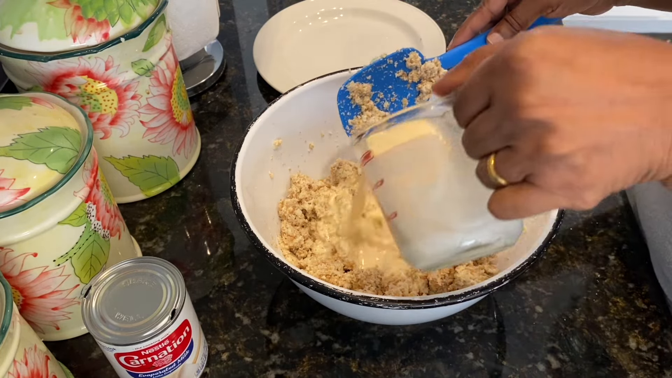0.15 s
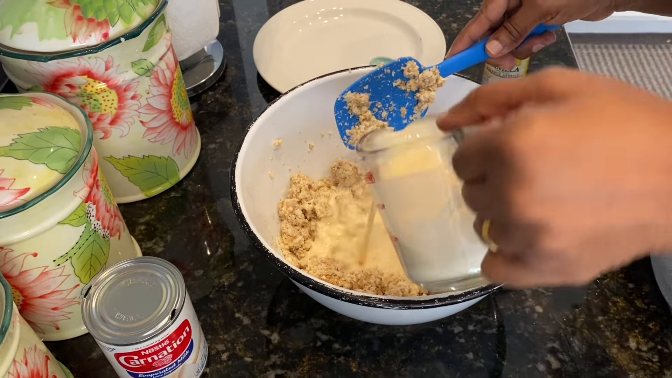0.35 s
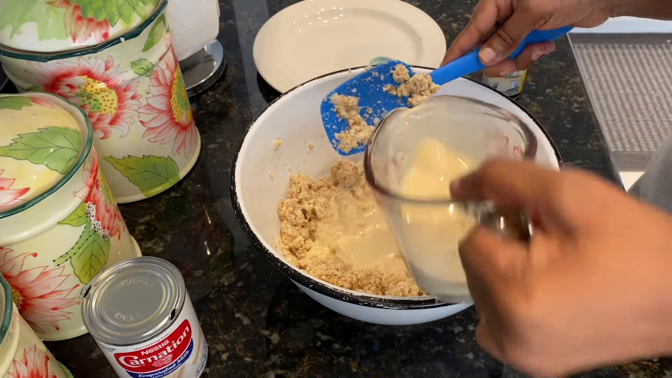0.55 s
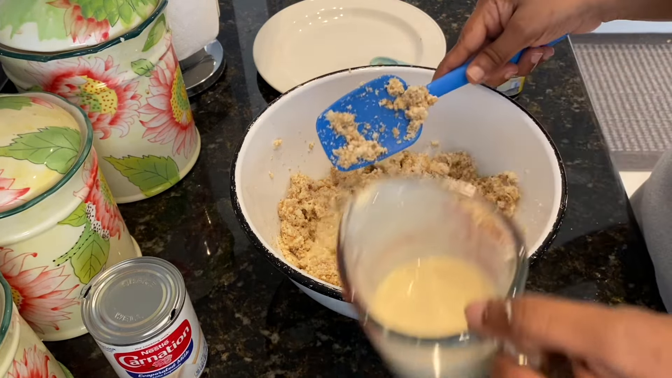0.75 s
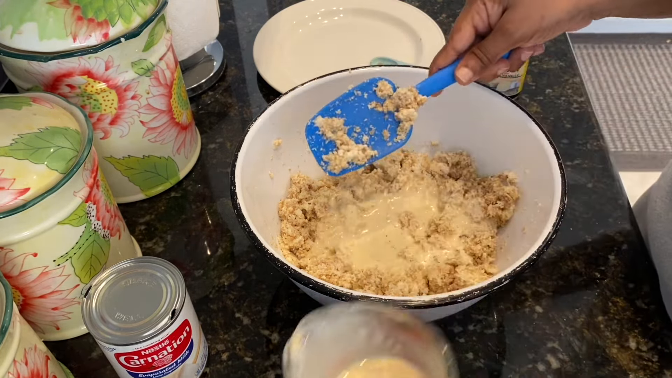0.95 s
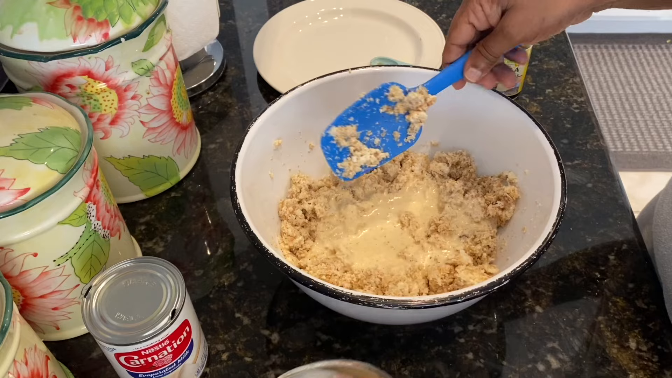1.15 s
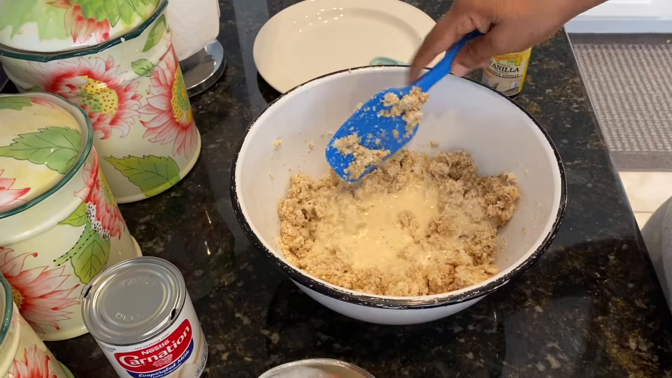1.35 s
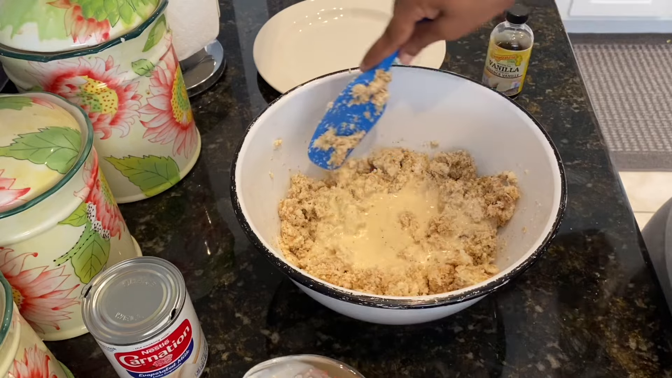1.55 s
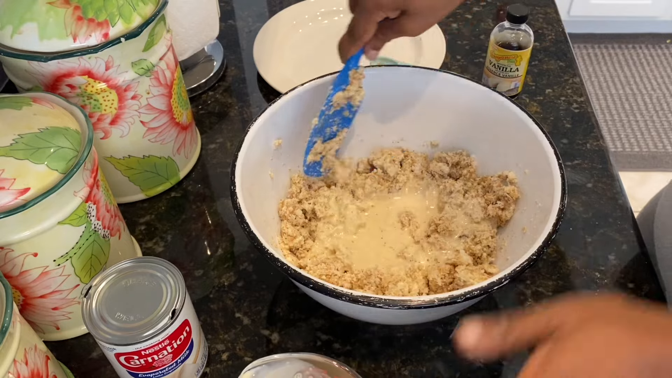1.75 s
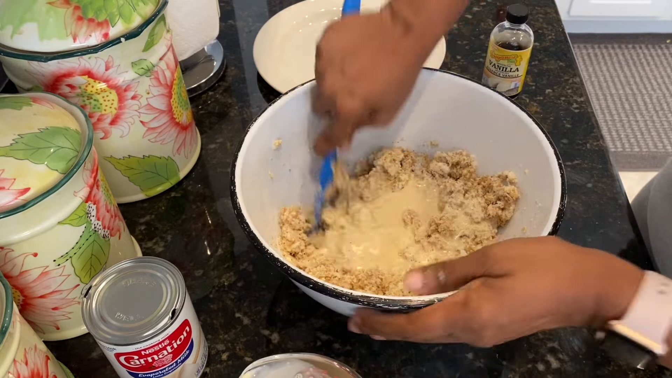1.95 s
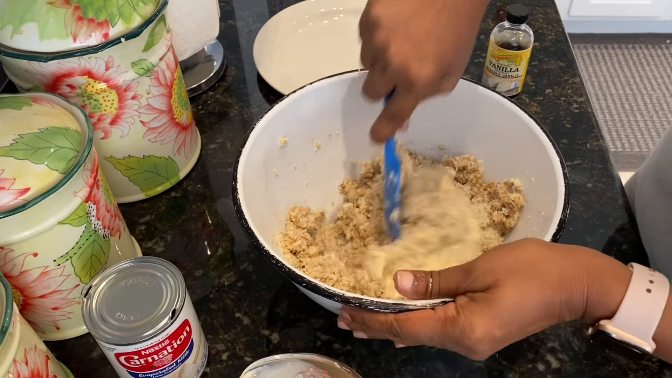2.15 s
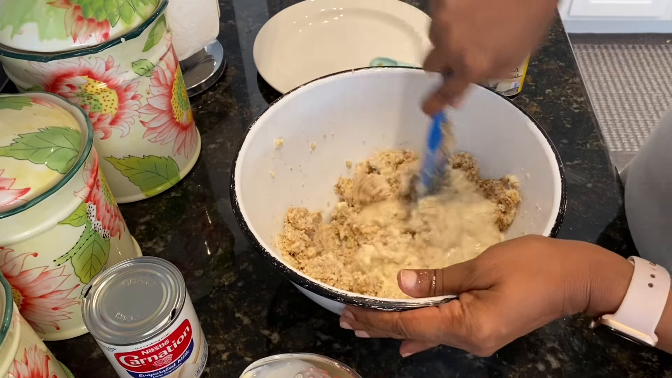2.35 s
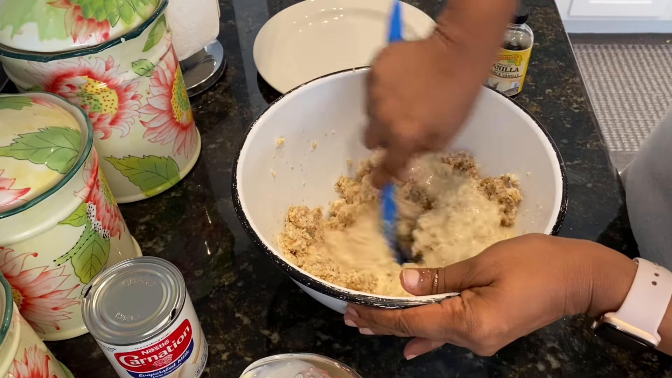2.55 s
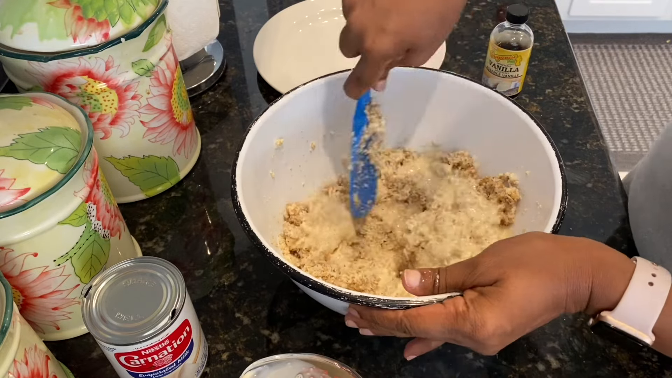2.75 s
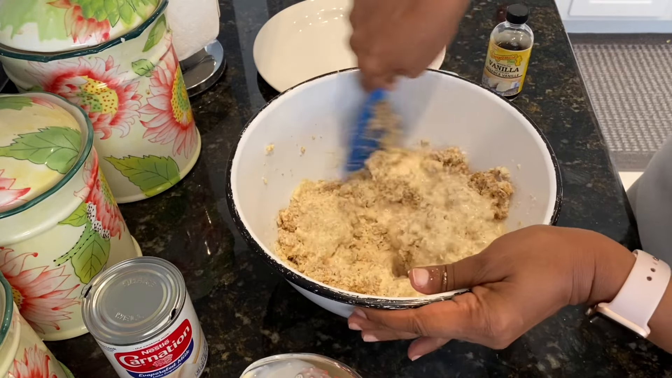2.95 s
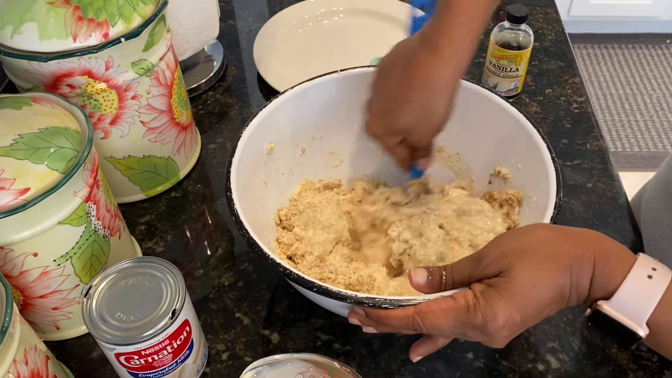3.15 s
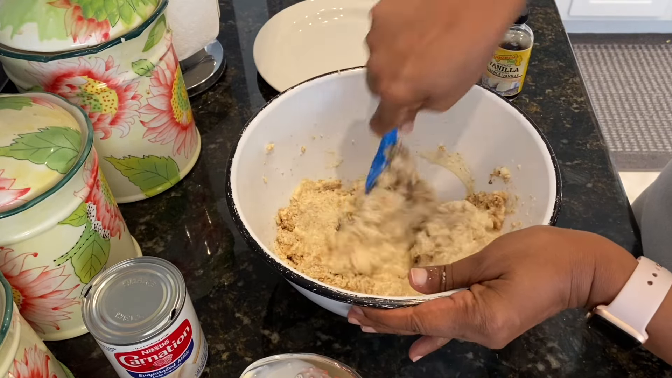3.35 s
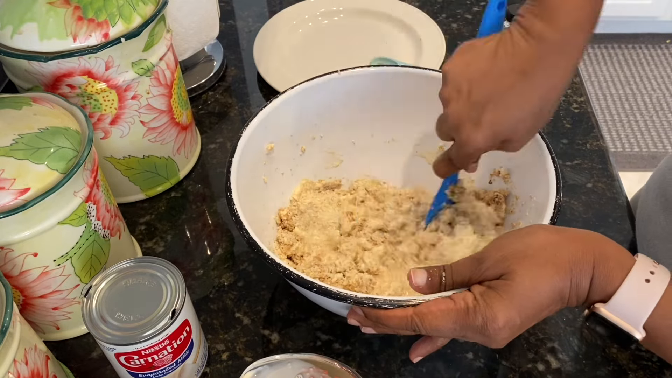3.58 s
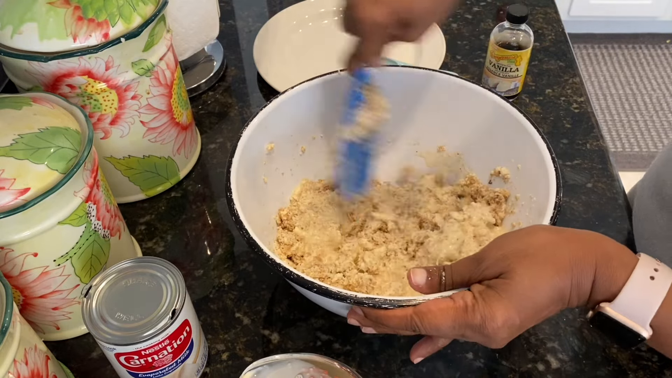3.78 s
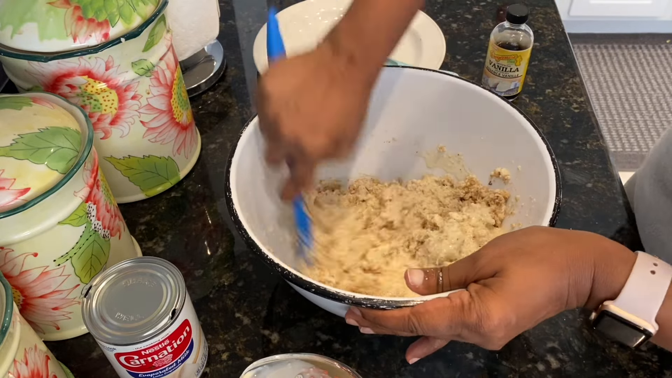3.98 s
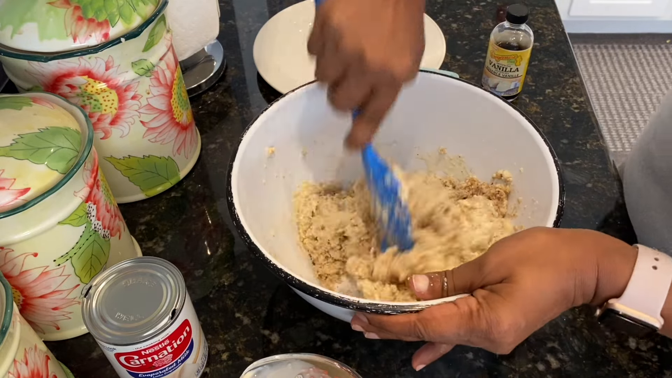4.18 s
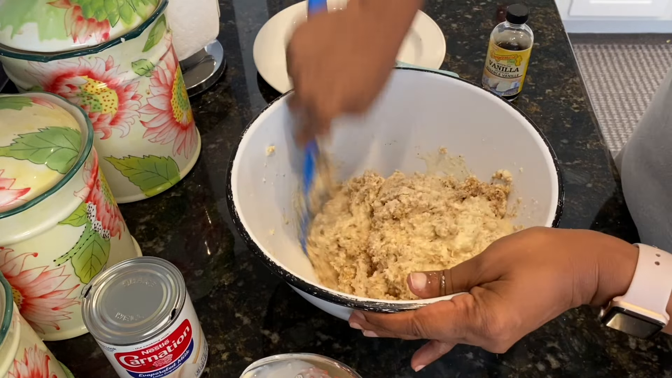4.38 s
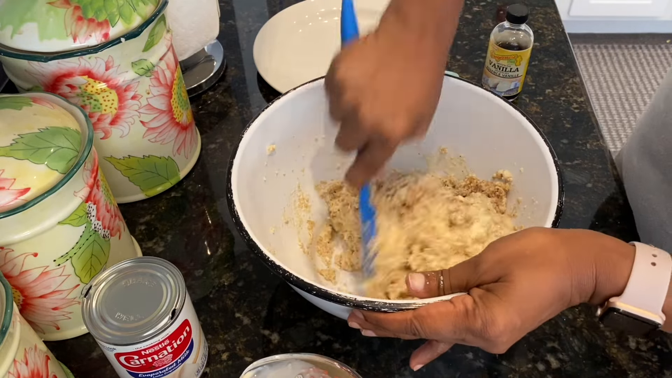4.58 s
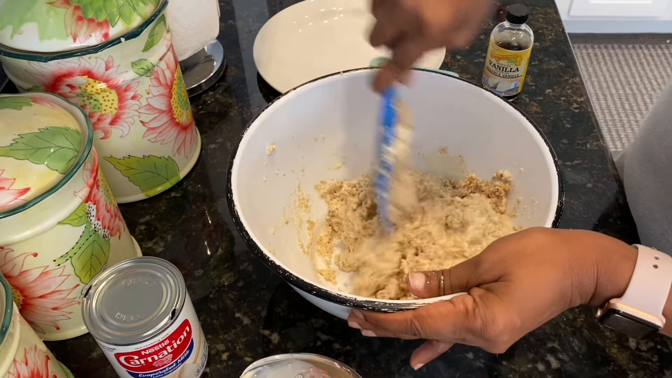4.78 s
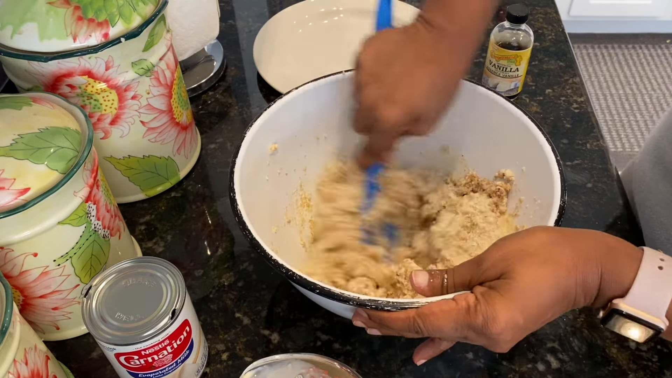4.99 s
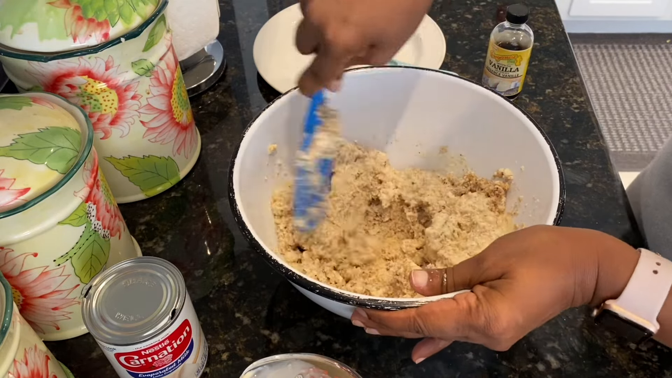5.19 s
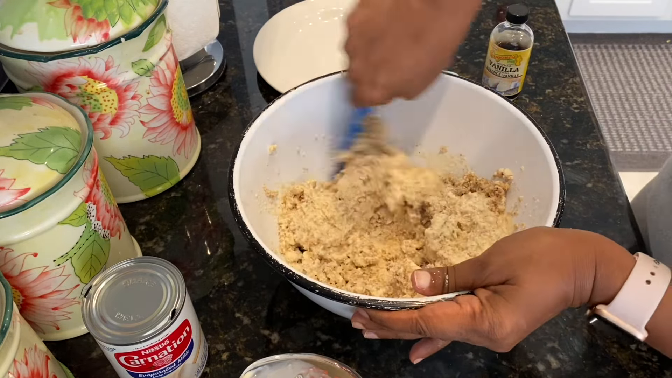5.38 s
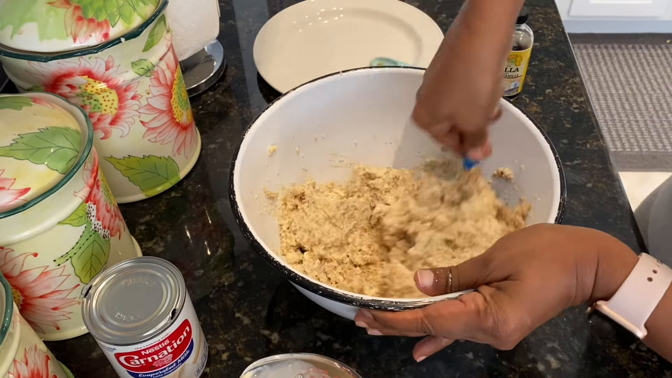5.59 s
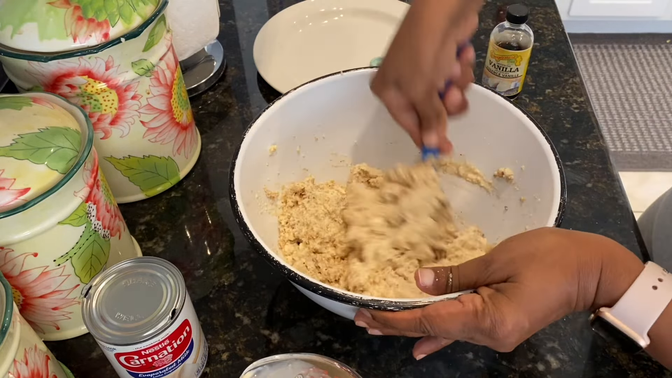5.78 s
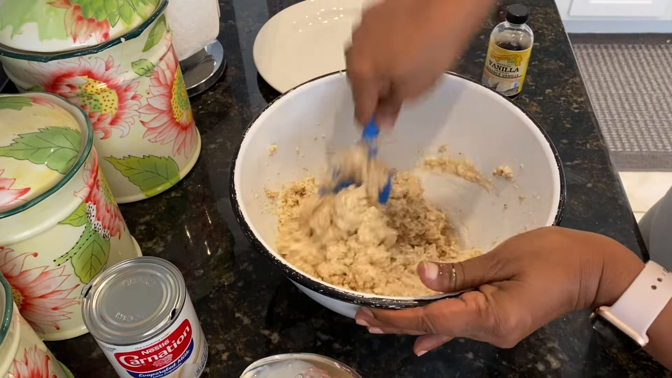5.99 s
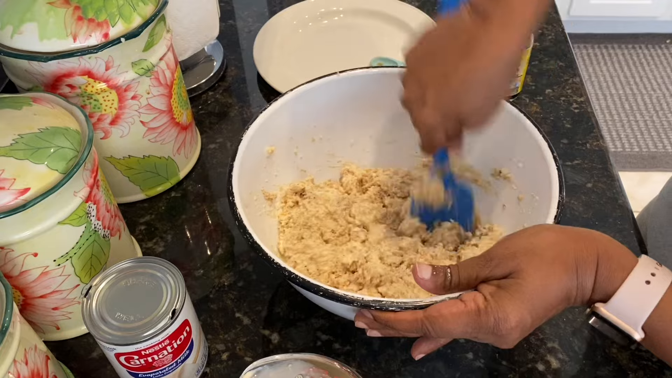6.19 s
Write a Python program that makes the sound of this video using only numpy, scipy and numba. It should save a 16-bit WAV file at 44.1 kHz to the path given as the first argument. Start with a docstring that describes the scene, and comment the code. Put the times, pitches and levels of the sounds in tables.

```python
"""A small kitchen with a humming appliance: a last trickle of milk runs into a bowl of grated mixture.
The glass jug is set down on a stone counter: hard pulses, scattered rattle and decaying modes of glass and stone.
Then a rubber spatula folds the wet mass: clouds of short rising tones are its bursting films and bubbles,
while the bowl taps, thuds and rumbles on the counter. A close stereo microphone hears it all."""
import sys
import numpy as np
from scipy import signal
from scipy.fft import rfft, irfft, next_fast_len
from scipy.io import wavfile
from scipy.ndimage import uniform_filter1d, minimum_filter1d
from numba import njit

SR = 44100
rng = np.random.default_rng(int(sys.argv[2]) if len(sys.argv) > 2 else 0)


def dump(signal):
    """Clip the signal to [-1, 1] and save it as 16-bit WAV at the path in sys.argv[1]."""
    limited = np.clip(np.atleast_2d(signal).T, -1, 1)
    pcm = np.round(limited * 32767).astype(np.int16)
    wavfile.write(sys.argv[1], SR, pcm)


N = 274743
TIME = np.arange(N) / SR
AGE = TIME[:SR // 2]  # time since a blow, s

# All table levels are relative; the functions that play them set the balance.
# the kitchen's steady air: (frequency [Hz], level per Hz [dB])
AIR_COLOUR = [(22, -21.5), (45, -4), (72, 2.5), (110, -5.5), (200, -9), (290, -10), (450, -13.5),
              (720, -16), (1200, -24.5), (1600, -25.5), (2100, -36.5), (2700, -63), (7500, -62.5),
              (16000, -41.5)]
AIR_DB = -54
# how unlike the two channels are in diffuse sound: (frequency [Hz], side level [dB])
WIDTH = [(60, -17.5), (250, -7.5), (600, -2), (1400, 1.5), (4000, -3.5), (9000, -16)]
# phase turn between the right and left channels: (frequency [Hz], turn [turns])
CHANNEL_TURN = [(7600, 0), (8400, .5), (9650, .5), (10300, 1), (12000, 1), (12600, 1.5), (13700, 1.5),
                (14300, 2)]
TOP_HZ = 15900

# the jug lands, chatters and settles: (time [s], clack [dB], thump [dB], crack [dB])
JUG_KNOCKS = [(1.1267, 0.5, -1, -21), (1.2679, -3, -7.5, -25), (1.2960, -7, -11.5, -31.5),
              (1.3100, -8, -11.5, -42.5), (1.3177, -8, -19.5, -44), (1.3244, -20, -18, -42),
              (1.3287, -14, -20, -48.5), (1.3324, -18.5, -21, -50), (1.4380, -3.5, -21, -21.5),
              (1.4462, 1, -5, -20), (1.4515, -7.5, -11, -27), (1.5174, -18.5, -19, -49),
              (1.5221, -12.5, -20.5, -49), (1.527, -19, -26, -43), (1.5328, -14.5, -24, -49),
              (1.5662, -21, -36, -64), (1.5977, -27, -38, -58)]
# contacts that set the glass ringing, damped by the hand:
# (time [s], level [dB], share of the free ring time [0-1])
JUG_RINGS = [(1.127, -28, 0.3), (1.296, -38.5, 0.6), (1.448, -18.5, 0.96), (1.739, -66, 0.6)]
# modes of the free glass: (frequency [Hz], level [dB], t60 [s])
GLASS_MODES = [(1904, -5, .14), (2141, -1, .35), (2488, -2.5, .27), (2925, -12, .1), (3070, -10, .07),
               (3521, -23, .11), (4380, -23, .14), (4420, -18, .23), (4520, -23, .17), (5500, -27, .1),
               (10080, -22, .06)]
# modes of the counter and what stands on it: (frequency [Hz], level [dB], t60 [s])
COUNTER_MODES = [(69, -9, .22), (96, -8, .14), (153, -10, .12), (218, -.5, .13), (238, -9, .07),
                 (354, -6.5, .1), (455, -2, .11), (497, -5, .08), (711, -4, .11), (765, -8, .07),
                 (851, -3, .11), (960, -2, .1), (1032, -5, .07), (1066, -4, .11), (1172, -4, .06),
                 (1212, -3, .11), (1255, -5, .06), (1311, -8, .1), (1387, -11, .1), (1527, -19, .1),
                 (1603, -19, .13)]
# hard edge of a jug contact: (frequency [Hz], level [dB])
CLACK_COLOUR = [(200, -41), (560, -27), (700, -4), (950, -5), (1200, 1), (1430, -11.5), (1750, -18),
                (4000, -44), (12000, -72.5)]
# weight behind a jug contact: (frequency [Hz], level [dB])
THUMP_COLOUR = [(40, -41), (220, -12), (280, -11.5), (350, 2), (490, -2.5), (580, -22.5), (1500, -48),
                (6000, -81)]
# sharp, scattered edge of a contact: (frequency [Hz], level [dB])
CRACK_COLOUR = [(300, -13.5), (1200, 6), (1600, 10.5), (1730, -0.5), (1880, 12.5), (2010, 1), (2160, 14),
                (2380, 3.5), (3080, 2), (3420, -7), (4400, -8.5), (5000, -13.5), (7000, -20.5),
                (11000, -26.5), (16000, -33)]
# scattered rattle of a contact: (frequency [Hz], level [dB])
RATTLE_COLOUR = [(30, -49), (215, -1.5), (275, -9), (350, -0.5), (470, 6.5), (570, -7.5), (720, -2.5),
                 (1200, -3), (1720, -14.5), (1900, -12), (2500, -17), (4000, -39.5)]

# the bowl taps the counter as it is gripped and pushed: (time [s], clack [dB])
BOWL_TAPS = [(1.739, -21.5), (1.754, -27), (1.780, -31), (2.026, -28), (2.039, -36.5), (2.527, -36.5),
             (2.613, -39), (3.054, -29), (3.066, -34), (3.175, -31.5), (3.180, -30), (3.194, -38),
             (3.822, -46.5), (5.324, -34.5), (5.659, -41.5)]
# scattered colour of a bowl tap: (frequency [Hz], level [dB])
TAP_COLOUR = [(200, -35), (550, 18), (820, -15), (1250, -2), (1600, 0), (3000, -13), (8000, -23)]
# lighter taps come by chance, at this rate under the hardest pressure
LIGHT_TAPS_PER_S, LIGHT_TAP_DB = 7, -49
# the blade plunges to the bottom: (time [s], knock [dB], boom [dB], knock pitch [Hz])
THUDS = [(1.781, -38, -31.5, 325), (2.503, -51.5, -42, 583), (2.975, -62, -44, 299.8),
         (3.821, -40.5, -34.5, 520), (4.325, -49.5, -40, 299.6)]
# rumble of the mass dragging on the bowl: (frequency [Hz], level [dB])
DRAG_COLOUR = [(25, -17), (50, -11), (68, 14), (100, -11), (150, -3.5), (220, -13.5), (300, -29),
               (450, -16), (800, -22.5), (2000, -42)]
DRAG_DB = -1  # relative to the pressure

# bubbles trapped by the trickle: (time [s], level [dB], starting pitch [Hz])
DRIPS = [(0.011, -44, 1780), (0.027, -46, 2400), (0.03, -47, 2630), (0.089, -48, 1850),
         (0.189, -47.5, 2210), (0.199, -46.5, 2340)]
# the trickle's patter: (frequency [Hz], level [dB])
POUR_COLOUR = [(800, -18), (1900, 2), (2700, 1), (4000, 3.5), (7500, -2), (11000, 4.5), (16000, 0)]
# the milk runs in gulps until the jug is tipped back, then seeps into the mixture
POUR_END_S, POUR_RELEASE_S, POUR_DB = 0.14, 0.029, -65.5
GULP_HZ, GULP_DB, SEEP_DB = 31.6, 3, -88
# tiny bubbles pop in the fresh milk until the stirring begins
POPS_PER_S, POP_DB, POP_SCATTER_DB, POP_HZ = 80, -80.5, 3.5, 11500

# spatula strokes: (start [s], length [s], release [s], crackle [dB], swell over the stroke [dB],
# place of the hardest press [0-1], squelch [dB])
STROKES = [(1.771, 0.34, .025, -56.5, -4, 0.18, -58.5), (2.229, 0.32, 0.038, -58.5, 5, 0.96, -56),
           (2.737, .05, 0.019, -68, 6, 0.54, -68), (2.797, 0.42, 0.097, -53, -6, 0.56, -50.5),
           (3.438, 0.14, 0.066, -57, 0, 0.19, -55.5), (3.826, .12, 0.066, -51, 0, 0.51, -50.5),
           (4.019, .12, 0.018, -54, 3, 0.15, -59), (4.275, .14, 0.049, -51.5, -2.5, 0.43, -50),
           (4.494, .11, 0.03, -57, 3.5, 0, -61), (4.741, 0.21, 0.043, -54, 9, 0.67, -53.5),
           (5.186, 0.065, 0.022, -57.5, 9.5, 0.96, -65.5), (5.255, 0.57, 0.043, -53.5, -5.5, 0.08, -55),
           (5.922, 0.19, .03, -57, 0.5, 0.91, -52)]
# the blade sinks in; pressure builds to its peak and eases off
ATTACK_S, SINK_S, WITHDRAW_S, PRESS_START_DB, PRESS_END_DB = .02, .022, .12, -12, -7
# after each stroke the mass settles faintly
SETTLE_DB, SETTLE_S = -70, 0.081
# the mass gives way in uneven clumps: spread of their strength, and how quickly they follow
CLUMP_DB, CLUMP_HZ = 1.7, 16
# air pockets burst under the milk, then around the blade:
# (time [s], level [dB], pitch [Hz], length [s])
SMACKS = [(0.025, -52.5, 830, 0.004), (0.076, -55.5, 2900, 0.014), (0.077, -50, 8750, 0.015),
          (0.097, -57.5, 5160, 0.021), (0.14, -63, 3650, 0.0032), (0.155, -74, 11000, 0.0051),
          (0.18, -57.5, 7630, 0.009), (0.225, -67, 5500, 0.0035), (0.247, -56, 13500, 0.017),
          (0.283, -57, 4570, 0.004), (0.384, -72, 7000, .006), (0.404, -63.5, 7600, 0.0088),
          (0.419, -68.5, 6100, .008), (0.444, -66, 11600, 0.0036), (0.46, -69, 10500, .003),
          (0.539, -66, 11200, 0.0046), (0.579, -69, 7600, 0.0023), (0.789, -79, 4070, .004),
          (0.851, -63.5, 11500, .002), (0.961, -64.5, 10900, 0.0059), (2.066, -56, 4170, 0.0055),
          (2.075, -56, 2340, .004), (2.155, -52, 10700, 0.0017), (2.215, -56, 7950, .003),
          (2.229, -56.5, 11450, .005), (2.276, -54, 10500, 0.0045), (2.295, -57, 5440, 0.0034),
          (2.322, -49, 1155, 0.0098), (2.334, -48.5, 2430, 0.0037), (2.445, -51.5, 2370, .01),
          (2.459, -48, 6960, 0.006), (2.674, -54, 7050, 0.0056), (2.802, -48, 6900, 0.0018),
          (2.855, -47, 6240, 0.027), (3.0534, -44.5, 3872, 0.0028), (3.063, -48, 4500, 0.0037),
          (3.11, -58, 3798, 0.0028), (3.226, -58, 3404, .003), (3.337, -61, 12000, 0.0019),
          (3.434, -53, 4000, 0.0018), (3.466, -51, 3100, 0.013), (3.539, -53, 3518, 0.015),
          (3.582, -51.5, 6000, .012), (3.678, -58, 7100, 0.0038), (3.737, -50, 7520, 0.004),
          (3.7803, -47, 6230, 0.0046), (4.029, -49, 1499, 0.0039), (4.137, -53, 5155, 0.0046),
          (4.209, -57.5, 6490, 0.0036), (4.261, -47, 6290, 0.035), (4.334, -44, 2903, 0.014),
          (4.376, -50, 1847, 0.013), (4.421, -55.5, 3242, .005), (4.576, -56, 5580, .012),
          (4.7273, -56.5, 4015, 0.003), (4.794, -53, 3494, .012), (4.844, -51, 4206, .005),
          (4.917, -50, 2388, 0.013), (4.954, -45, 5835, 0.012), (5.004, -52, 5960, 0.0077),
          (5.0418, -50.5, 3474, 0.0039), (5.184, -56, 6316, 0.016), (5.324, -46, 2052, 0.003),
          (5.365, -54, 2005, 0.032), (5.476, -48, 4720, .014), (5.907, -49.5, 2976, .005),
          (6.103, -49, 2574, 0.013)]
# a tear this long takes its own length to swell; shorter ones start far more sharply
SOFT_TEAR_S = 0.037
# small films part at random; their level follows the tearing of the surface
SNAPS_PER_S, SNAP_TO_TEAR_DB, SNAP_SCATTER_DB = 16, -10.5, 8.5
SNAP_LOW_HZ, SNAP_HIGH_HZ = 1730, 10600
# fine films: (frequency [Hz], level [dB])
CRACKLE_COLOUR = [(2000, -18), (3500, -3.5), (5000, -2.5), (6900, 3), (8500, -2), (11000, -1),
                  (16000, -1.5)]
# wider gaps: (frequency [Hz], level [dB])
SQUISH_COLOUR = [(600, -27.5), (1500, -2.5), (2500, 2.5), (4200, -0.5), (5500, -2.5), (8000, -24)]
# large air pockets: (frequency [Hz], level [dB])
SQUELCH_COLOUR = [(250, -14), (500, 3), (750, -2), (1000, 2), (1300, -4), (1620, 1), (2000, -2), (3200, -7),
                  (6000, -14)]


def amp(db):
    """Decibels to gain."""
    return 10 ** (np.asarray(db) / 20)


def unit(x):
    """Scale to rms 1."""
    return x / np.sqrt(np.mean(x ** 2))


def fade(t60):
    """Exponential decay after a blow, 60 dB down at t60 seconds."""
    return np.exp(-np.log(1000) * AGE / t60)


def add(out, s, sound):
    """Mix a sound in at time s."""
    i = max(int(s * SR), 0)
    out[..., i:i + sound.shape[-1]] += sound[..., :N - i]


def balance(left_db):
    """Channel gains that lean left by left_db in all."""
    return amp(np.array([[left_db], [-left_db]]) / 2)


def colour(x, points):
    """Causal minimum-phase filter through (Hz, dB) points, its phase found by folding the cepstrum."""
    size = 2 * next_fast_len(x.shape[-1])
    hz, db = np.transpose(points)
    freq = np.maximum(np.arange(size // 2 + 1) * SR / size, 1)
    gain = amp(np.interp(np.log(freq), np.log(hz), db))
    cepstrum = irfft(np.log(gain))
    cepstrum[1:size // 2] *= 2
    cepstrum[size // 2 + 1:] = 0
    return irfft(rfft(x, size) * np.exp(rfft(cepstrum)))[..., :x.shape[-1]]


def wander(hz):
    """Slow chance movement up to about hz, spread 1."""
    return unit(colour(rng.standard_normal(N), [(hz, 0), (4 * hz, -50)]))


def chance_times(per_s):
    """Random moments at a steady or changing rate."""
    return TIME[rng.random(N) < per_s / SR]


def diffuse(size, side_db=0):
    """Noise from all around: alike in both channels in the bass, unlike in the middle."""
    mid, side = rng.standard_normal((2, size))
    side = amp(side_db) * colour(side, WIDTH)
    return unit(np.array([mid + side, mid - side]))


def ring(hz, t60, lead=0, phase=0):
    """One decaying mode; it reaches the left channel earlier by lead radians."""
    offset = phase + lead * np.array([[.5], [-.5]])
    return np.sin(2 * np.pi * hz * AGE + offset) * fade(t60)


def clack(hz, t60, lead):
    """A hard contact: one slightly random pitch that swells briefly and dies, peak 1."""
    burst = ring(hz * (1 + 0.032 * rng.standard_normal()), t60, lead) * AGE
    return burst / np.abs(burst).max()


def scatter(spectrum, t60, side_db=-4):
    """A burst of dense, quickly dying vibration, made of coloured noise."""
    return unit(colour(diffuse(len(AGE), side_db), spectrum)) * fade(t60)


def pulse(spectrum, late_s, lag_s):
    """One short contact wave, peak 1; it starts late_s after the contact and lag_s later on the right."""
    push = np.sinc((AGE - late_s - lag_s * np.array([[0], [1]])) * SR)
    wave = colour(push, spectrum)
    return wave / np.abs(wave).max()


@njit
def bubbles(start, hz, cycles, size, lead, glide, count):
    """Short decaying tones that rise in pitch as they die, in a sound count samples long."""
    out = np.zeros((2, count))
    for k in range(len(start)):
        length = int(cycles[k] * SR / hz[k]) + 2
        gain, phase = size[k] / np.sqrt(length), 0.
        for i in range(min(length, count - start[k])):
            phase += 2 * np.pi * hz[k] / SR * (1 + glide * i / length)
            out[0, start[k] + i] += gain * np.sin(phase + lead[k] / 2)
            out[1, start[k] + i] += gain * np.sin(phase - lead[k] / 2)
            gain *= 1 - 5 / (length + 5)
    return out


def kitchen(hum_hz=368, hum_width_hz=7, hum_db=-63):
    """Steady air noise, and an appliance fan's hum: a tone whose phase and strength waver by chance."""
    waver = colour(rng.standard_normal((2, N)), [(hum_width_hz, 0), (8 * hum_width_hz, -50)])
    turn = 2 * np.pi * hum_hz * TIME
    hum = unit(waver[0] * np.cos(turn) + waver[1] * np.sin(turn))
    air = unit(colour(diffuse(N), AIR_COLOUR))
    return amp(AIR_DB) * air + amp(hum_db + np.array([[-3], [2]])) * hum


def room(x, t60, wet_db, build=0.0013):
    """Cupboards and walls return a short tail: dense noise that builds at once and decays."""
    tail = colour(diffuse(len(AGE)), [(100, -5.0), (1500, -4.0), (5000, -3.0), (15000, -14.5)])
    tail *= fade(t60) * (1 - np.exp(-(AGE / build) ** 2))
    tail /= np.sqrt(np.sum(tail ** 2) / 2)
    return x + amp(wet_db) * signal.fftconvolve(x, tail, axes=1)[:, :N]


def counter(low_db, high_db, swell_cycles=0.9, lead=0.8):
    """Counter modes: a blow's weight drives the low, slower-swelling ones, its clack the high ones."""
    spot = rng.uniform(-np.pi, np.pi, len(COUNTER_MODES))
    out = 0
    for k, (hz, db, t60) in enumerate(COUNTER_MODES):
        drive_db = low_db if hz < 600 else high_db
        side = lead * (-1) ** k * hz / 1000
        # short waves feel where the contact falls, long ones hardly
        mode = ring(hz, t60, side, spot[k] * min(hz / 400, 1))
        swell = 1 - np.exp(-(AGE * hz / swell_cycles) ** 2)
        out = out + amp(db + drive_db) * mode * swell
    return out


def jug(left_db=1.5):
    """Thick glass knocks on stone, rocks, and rings once it stands free, a little to the left."""
    out = np.zeros((2, N))
    sharp = pulse(CLACK_COLOUR, late_s=.0002, lag_s=.00011)
    heavy = pulse(THUMP_COLOUR, late_s=.0012, lag_s=.00016)
    for s, clack_db, thump_db, crack_db in JUG_KNOCKS:
        knock = amp(clack_db - 0.5) * sharp + amp(thump_db - 7.5) * heavy
        knock += counter(thump_db - 13.5, clack_db - 20)
        knock += amp(clack_db - 14) * scatter(RATTLE_COLOUR, t60=0.044)
        knock += amp(crack_db + 6) * scatter(CRACK_COLOUR, t60=0.065)
        add(out, s, knock)
    for s, ring_db, free in JUG_RINGS:
        glass = sum(amp(db) * ring(hz, t60 * free, lead=.6) for hz, db, t60 in GLASS_MODES)
        add(out, s, amp(ring_db) * glass)
    return out * balance(left_db)


def thud(knock_db, boom_db, hz):
    """A soft blow spreads through bowl and counter: a dull knock, lower waves, then a short boom."""
    dull = [(40, 0), (130, 3), (300, 4), (560, 2), (1200, -25)]
    knock = clack(hz, t60=0.017, lead=.2)
    knock = knock + amp(-3) * clack(hz=197, t60=0.074, lead=.1) + amp(-7) * scatter(dull, t60=0.085)
    boom = amp(16.5) * ring(hz=64.7, t60=0.15) * (1 - np.exp(-(AGE / 0.04) ** 4))
    boom = boom + amp(-16) * clack(hz=128, t60=0.13, lead=.1)
    return amp(knock_db) * knock + amp(boom_db) * boom


def bowl(press):
    """The bowl ticks on the counter, thuds under the blade and rumbles with the pressure of the mass."""
    out = amp(DRAG_DB) * press * unit(colour(diffuse(N), DRAG_COLOUR))
    for s, knock_db, boom_db, hz in THUDS:
        add(out, s, thud(knock_db, boom_db, hz))
    light = [(s, LIGHT_TAP_DB) for s in chance_times(LIGHT_TAPS_PER_S * press / press.max())]
    for s, db in list(BOWL_TAPS) + light:
        add(out, s, amp(db - 4.5) * clack(hz=910, t60=0.0056, lead=-0.56))
        add(out, s, counter(db - 33, db - 21) + amp(db - 23) * scatter(TAP_COLOUR, t60=0.08))
    return out


def milk():
    """Strength of the trickle over time: it gulps, stops and leaves a faint seeping."""
    running = np.exp(-np.maximum(TIME - POUR_END_S, 0) / POUR_RELEASE_S)
    return running * amp(POUR_DB + GULP_DB * wander(GULP_HZ)) + amp(SEEP_DB)


def smack(hz, length, spread=.2, cycles=15, snap_db=-2, count=9):
    """An air pocket tears: a noisy snap almost as strong as its bubbles around one pitch."""
    size = SR // 12
    when, place = rng.random((2, count))
    when *= np.arange(count) > 0  # the first bubble opens the burst
    pitch = np.minimum(hz * np.exp(spread * when ** .3 * rng.standard_normal(count)), TOP_HZ)
    sizes = amp(-9 * when) * rng.choice([-1, 1], count)
    start = (when * length * SR).astype(np.int64)
    lead = 1.8 * (place - .4)
    cluster = bubbles(start, pitch, np.full(count, 1. * cycles), sizes, lead, .2, size)
    snap_colour = [(hz / 6, -24), (hz / 2.5, -13), (hz * .8, -2), (hz, 0), (hz * 3, -7)]
    snap = colour(diffuse(size), snap_colour) * fade(.01 + 2 * length)[:size]
    snap *= 1 - np.exp(-AGE[:size] / (length ** 2 / SOFT_TEAR_S))
    # as much energy as 10 ms at rms 1
    return unit(unit(cluster) + amp(snap_db) * unit(snap)) * np.sqrt(.01 * SR / size)


def drips(chirp_per_s=3, t60=0.023, splash_db=-14):
    """Drips of milk splash, and each traps a bubble that rings briefly and rises in pitch."""
    out = np.zeros((2, N))
    for s, db, hz in DRIPS:
        tone = np.sin(2 * np.pi * hz * AGE * (1 + chirp_per_s * AGE))
        blip = tone * fade(t60) * (1 - np.exp(-AGE * hz / 2))
        add(out, s, amp(db) * blip)
        add(out, s, amp(db + splash_db) * smack(hz, length=.02))
    return out


def snaps(tear):
    """Small films burst here and there, in the fresh milk and behind the blade."""
    out = np.zeros((2, N))
    popping = chance_times(POPS_PER_S * (TIME < STROKES[0][0]))
    snapping = chance_times(SNAPS_PER_S)
    for s in popping:
        db = POP_DB + POP_SCATTER_DB * rng.standard_normal()
        add(out, s, amp(db) * smack(POP_HZ, length=0.003))
    for s in snapping:
        hz = SNAP_LOW_HZ * (SNAP_HIGH_HZ / SNAP_LOW_HZ) ** rng.random()
        db = SNAP_TO_TEAR_DB + SNAP_SCATTER_DB * rng.standard_normal()
        add(out, s, tear[int(s * SR)] * amp(db) * smack(hz, length=.008))
    return out


def spatula():
    """Gains over time: how strongly the blade tears the surface, tears deep down, and presses."""
    tear, deep, press = np.zeros((3, N))  # summed as power
    for s, length, release, crackle_db, swell_db, hardest, squelch_db in STROKES:
        along = (TIME - s) / length
        since_lift = np.maximum(TIME - s - length, 0)
        entry = (1 + np.tanh((TIME - s) / ATTACK_S)) / 2
        contact = entry * np.exp(-since_lift / release)
        sinking = (1 + np.tanh((TIME - s - SINK_S) / (2 * SINK_S))) / 2
        depth = sinking * np.exp(-since_lift / WITHDRAW_S)
        tearing = contact * amp(crackle_db + swell_db * (np.clip(along, 0, 1) - .5))
        settling = entry * amp(SETTLE_DB) * np.exp(-since_lift / SETTLE_S)
        tear += tearing ** 2 + settling ** 2
        deep += (tearing * depth) ** 2
        peak = np.clip(hardest, 0, 1)
        pressure_db = np.interp(along, [0, peak, 1], [PRESS_START_DB, 0, PRESS_END_DB])
        press += (contact * amp(squelch_db + pressure_db)) ** 2
    return np.sqrt(tear), np.sqrt(deep), np.sqrt(press)


def wet_grains(level, spectrum, rate, scatter_db, cycles, top_hz, spread, patchy_db=0.0, clump=0.026):
    """A cloud of bursting films, each a short rising tone: denser and louder when the level is high."""
    busy = np.clip(level / level.max(), .3, 1)
    start = np.flatnonzero(rng.random(N) < busy * rate / SR)
    pitch, life, chance, place = rng.random((len(start), 4)).T
    hz = top_hz * (.04 + .96 * pitch)
    size = amp(scatter_db * -np.log(.01 + .99 * chance)) * rng.choice([-1, 1], len(start))
    # every clump (in s) favours its own pocket sizes, so the colour keeps shifting
    favourite = rng.random(N)[(start / SR / clump).astype(int)]
    patchy = amp(patchy_db * np.cos(2 * np.pi * (2 * np.log(hz) + favourite)))
    size = unit(size * patchy)
    lead = (2 * place - 1) * spread
    grains = bubbles(start, hz, cycles * (0.64 + 2 * life), size, lead, 0.22, N)
    cloud = colour(grains, spectrum)
    # even out the density's own loudness before the level is applied
    return unit(cloud / np.sqrt(busy)) * level


def mixture(flow, tear, deep, press):
    """Milk patters in; strokes tear fine films (crackle), wider gaps (squish) and big pockets (squelch)."""
    out = wet_grains(flow, POUR_COLOUR, rate=3500, scatter_db=3, cycles=12, top_hz=16000, spread=.9)
    crackle = wet_grains(tear, CRACKLE_COLOUR, rate=16000, scatter_db=1.9, cycles=15,
                         top_hz=16000, spread=1.1, patchy_db=3)
    squish = wet_grains(deep, SQUISH_COLOUR, rate=2400, scatter_db=2.5, cycles=14,
                        top_hz=6500, spread=1.3, patchy_db=4.5)
    squelch = wet_grains(press, SQUELCH_COLOUR, rate=3500, scatter_db=2.1, cycles=9,
                         top_hz=4500, spread=1.7, patchy_db=3)
    out += drips()
    out += amp(CLUMP_DB * wander(CLUMP_HZ)) * (crackle + amp(-10) * squish)
    out += amp(0.85 + CLUMP_DB * wander(CLUMP_HZ)) * squelch
    for s, db, hz, length in SMACKS:
        add(out, s, amp(db - 2) * smack(hz, length))
    return out


def scene(bowl_left_db=1.44):
    """Jug, bowl and mixture in the kitchen."""
    air = kitchen()
    clatter = room(jug(), t60=.35, wet_db=-16)
    flow = milk()
    tear, deep, press = spatula()
    stirring = mixture(flow, tear, deep, press) + bowl(press) + snaps(tear)
    stirring = room(stirring, t60=.3, wet_db=-14)
    return air + clatter + stirring * balance(bowl_left_db)


def turn_channels(x):
    """The channels alternate between in step and opposed through the high treble."""
    size = next_fast_len(N + SR // 10)
    turns = np.interp(np.arange(size // 2 + 1) * SR / size, *np.transpose(CHANNEL_TURN))
    shift = np.exp(1j * np.pi * turns * np.array([[-1], [1]]))
    return irfft(rfft(x, size) * shift, size)[:, :N]


def record(dry):
    """Two unequally coloured channels, a bass cut, a limiter for the hardest knocks and a steep top cut."""
    left = colour(dry[0], [(60, 2.2), (400, 1.1), (1300, 0.17), (4500, 0.38), (6500, 0.21), (8500, 0.29)])
    right = colour(dry[1], [(60, 0.032), (400, -1.1), (1300, -0.88), (4500, 0.32), (8000, 0.73)])
    bass_cut = signal.butter(2, 32, "high", fs=SR, output="sos")
    heard = signal.sosfilt(bass_cut, turn_channels(np.array([left, right])))
    headroom = .93 / np.maximum(np.abs(heard).max(axis=0), .93)
    gain = uniform_filter1d(minimum_filter1d(headroom, size=131), size=131)
    top_cut = signal.ellip(10, .2, 70, TOP_HZ, fs=SR, output="sos")
    return signal.sosfilt(top_cut, heard * gain)


dry = scene()
out = record(dry)
dump(out)
```